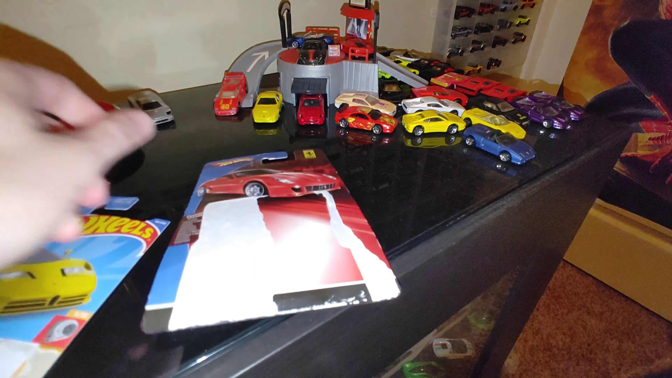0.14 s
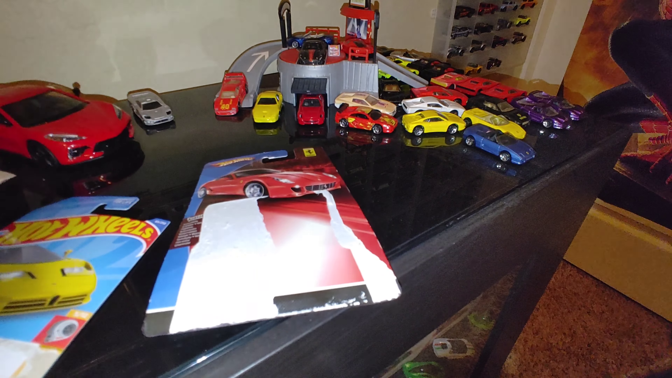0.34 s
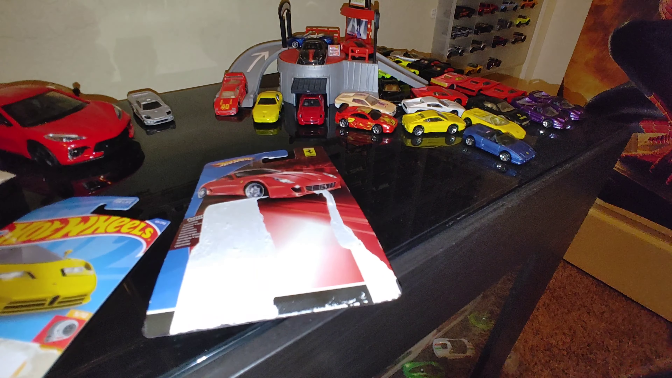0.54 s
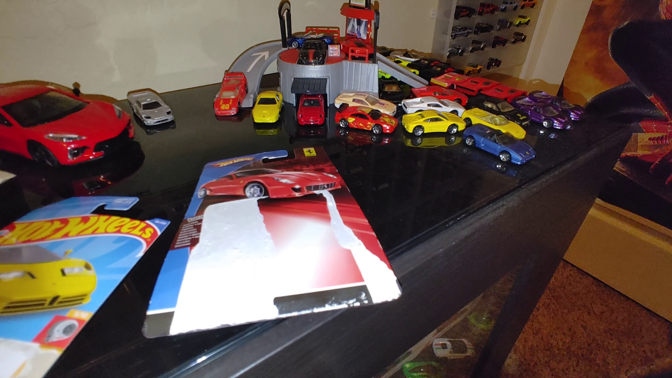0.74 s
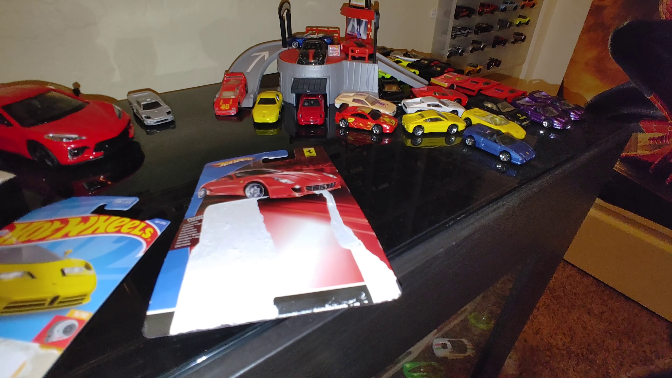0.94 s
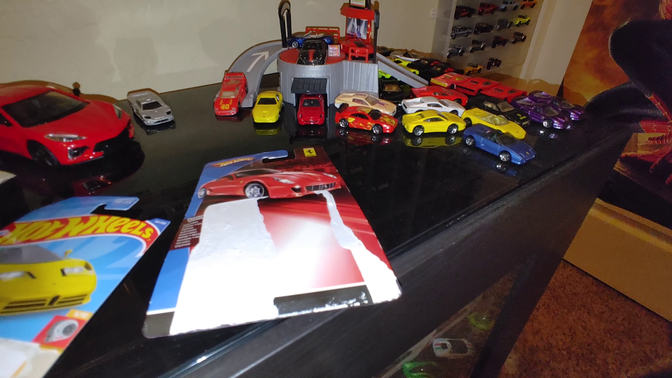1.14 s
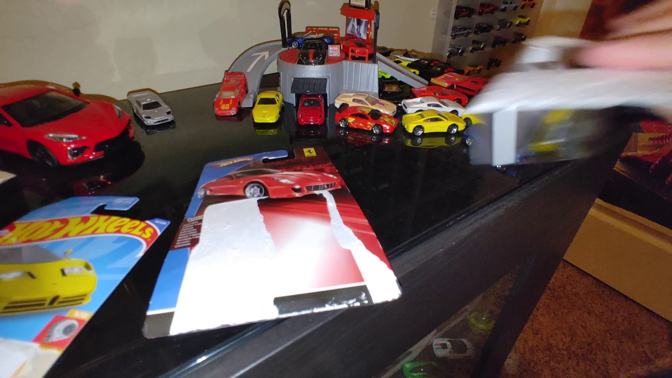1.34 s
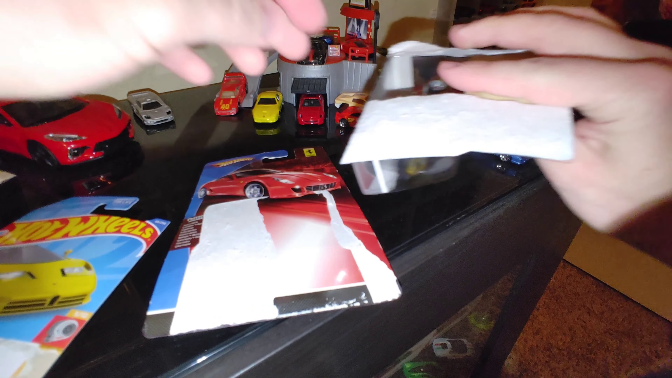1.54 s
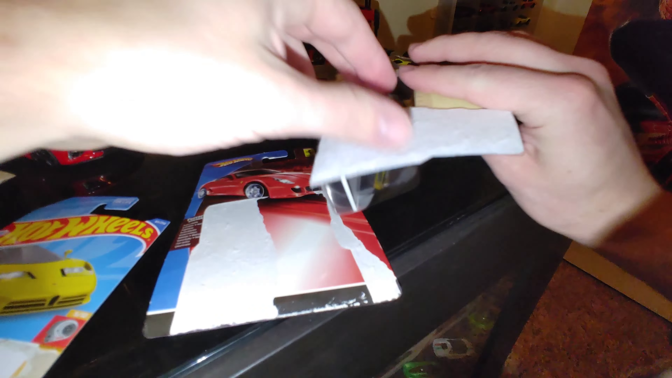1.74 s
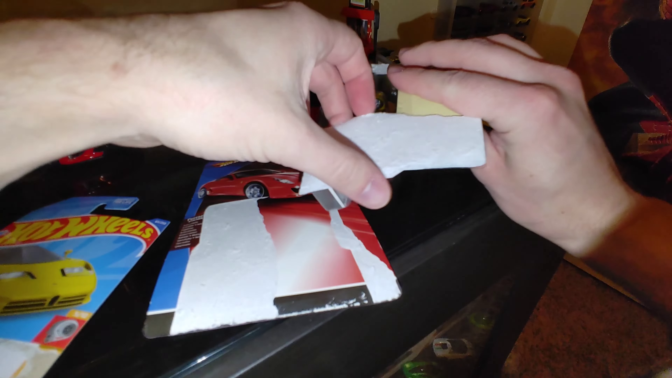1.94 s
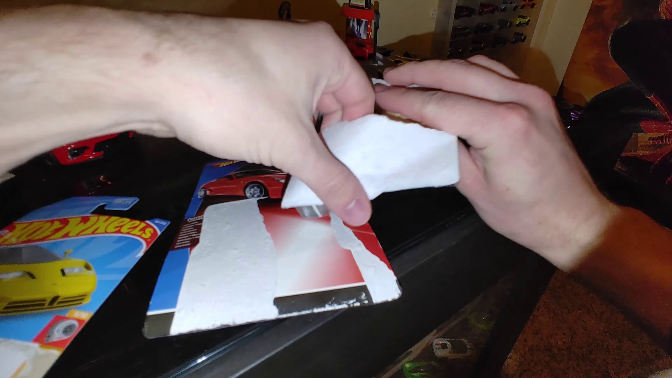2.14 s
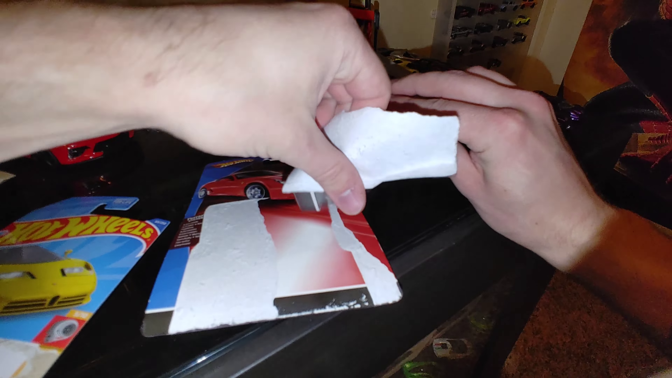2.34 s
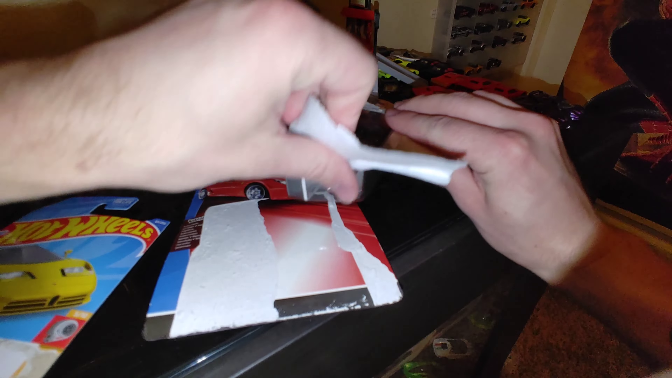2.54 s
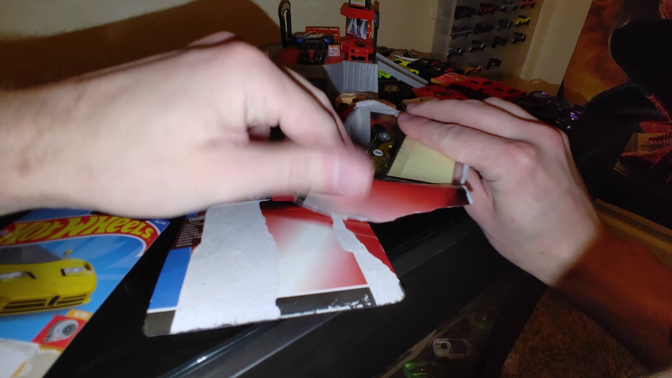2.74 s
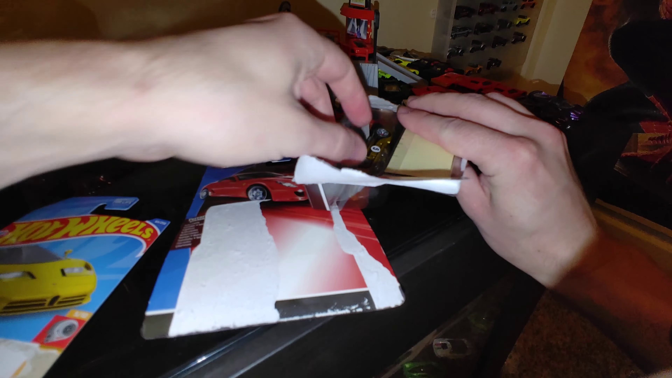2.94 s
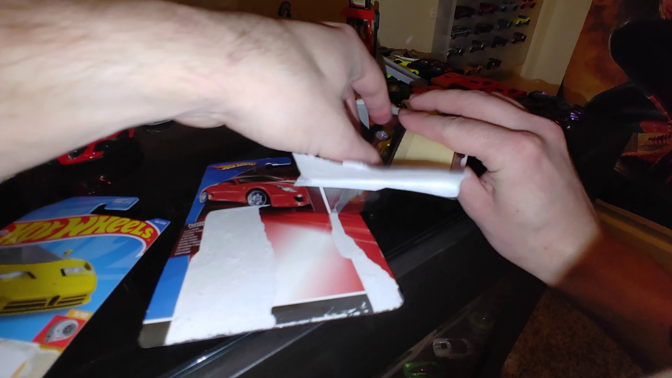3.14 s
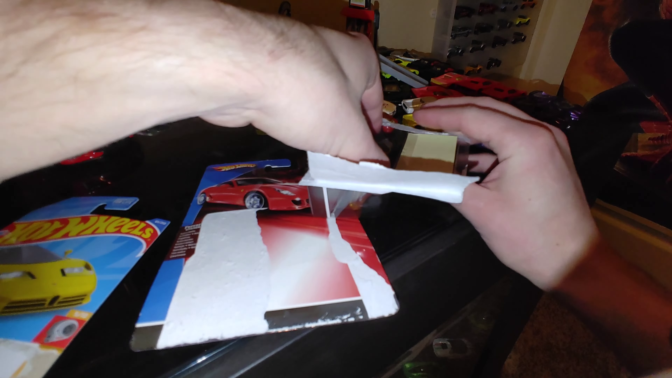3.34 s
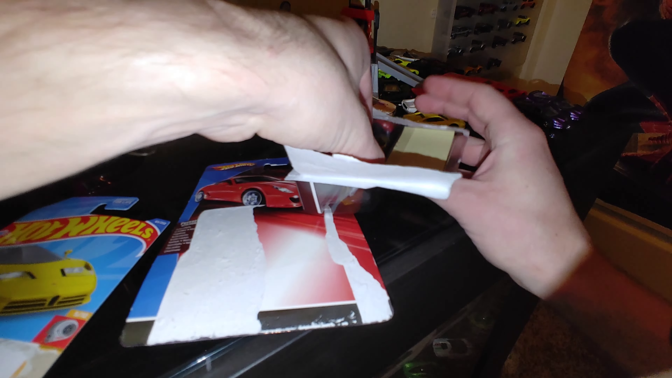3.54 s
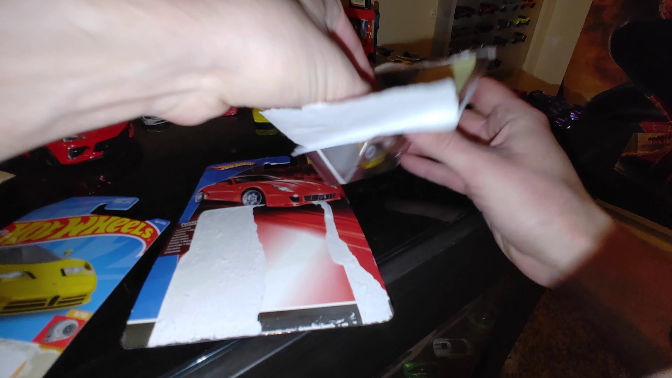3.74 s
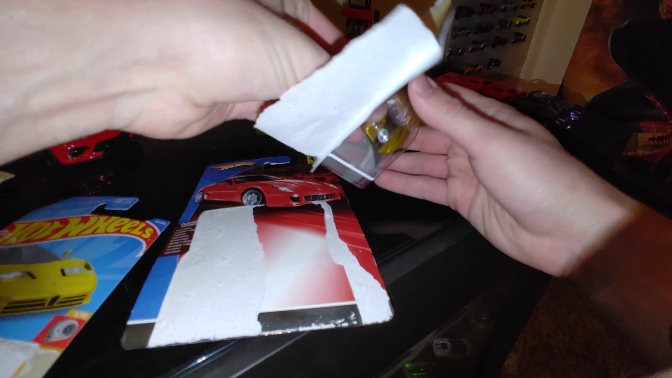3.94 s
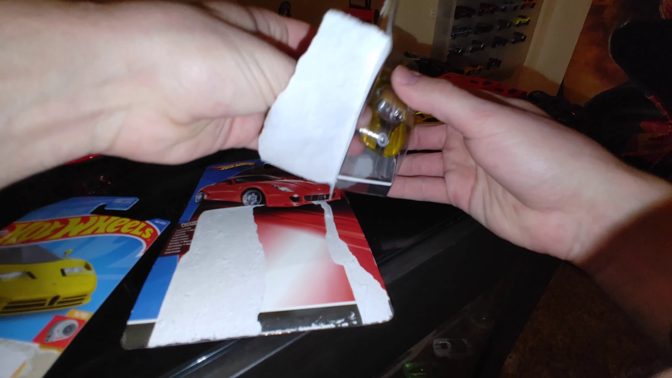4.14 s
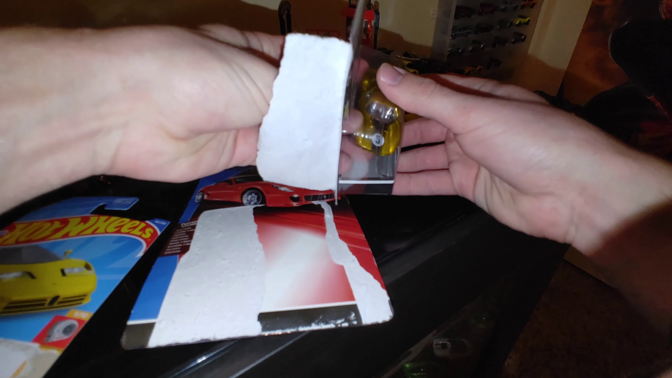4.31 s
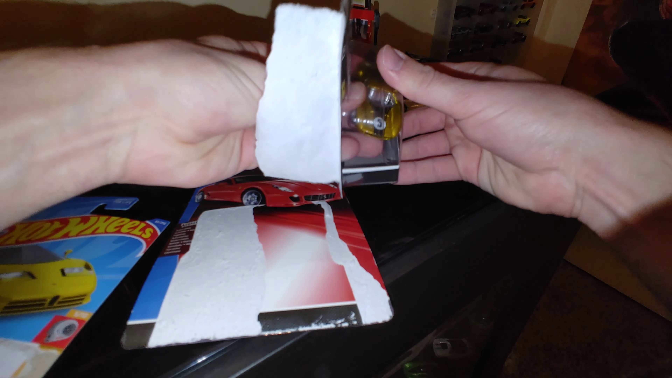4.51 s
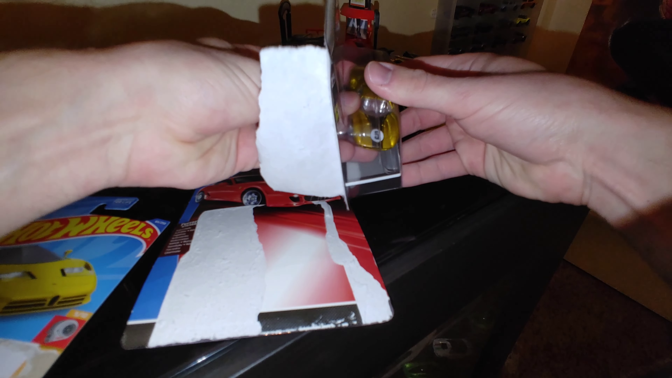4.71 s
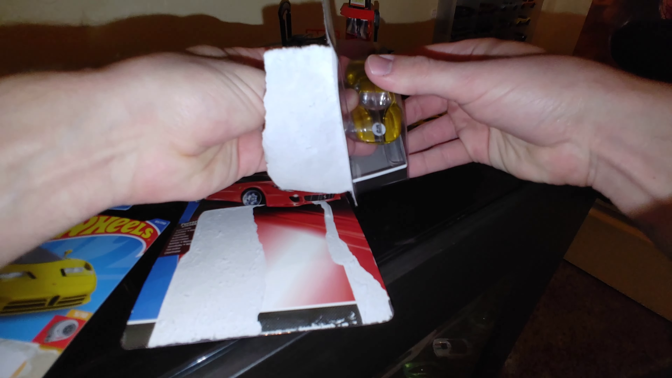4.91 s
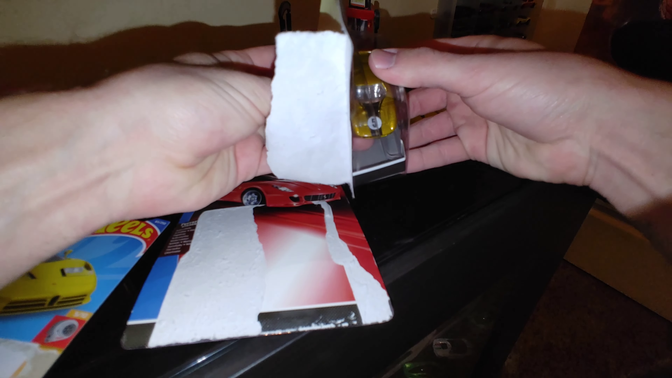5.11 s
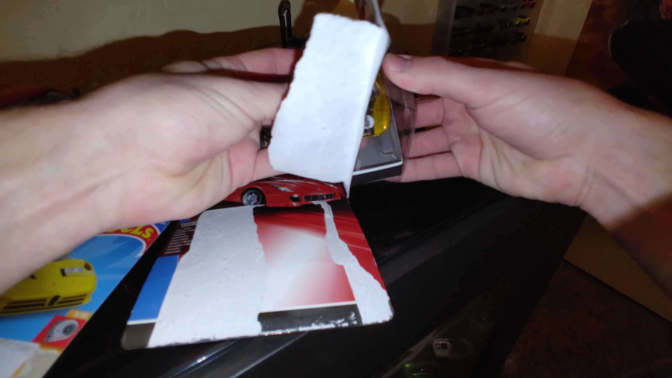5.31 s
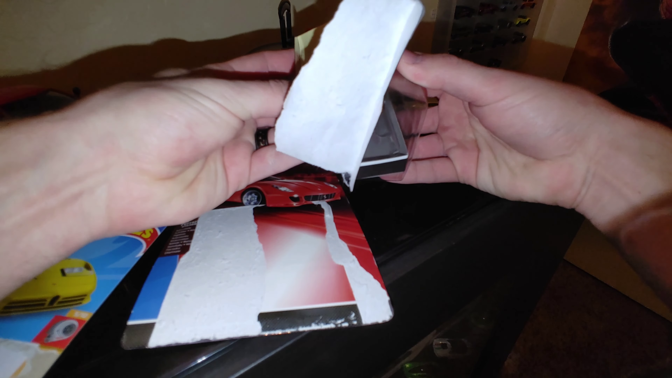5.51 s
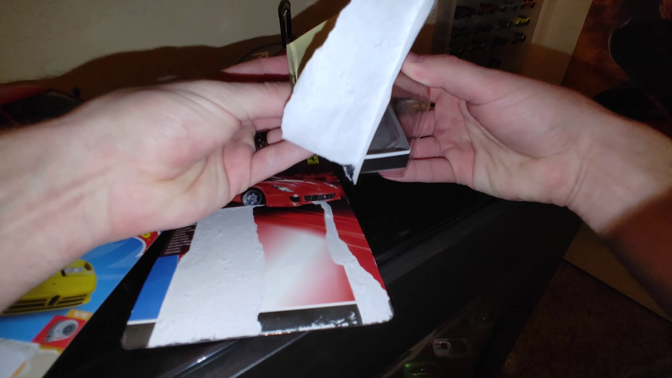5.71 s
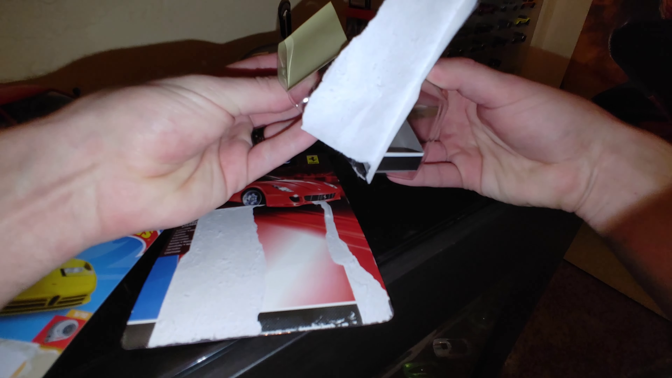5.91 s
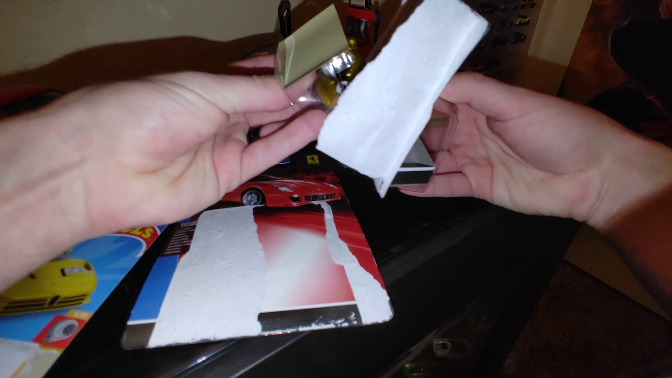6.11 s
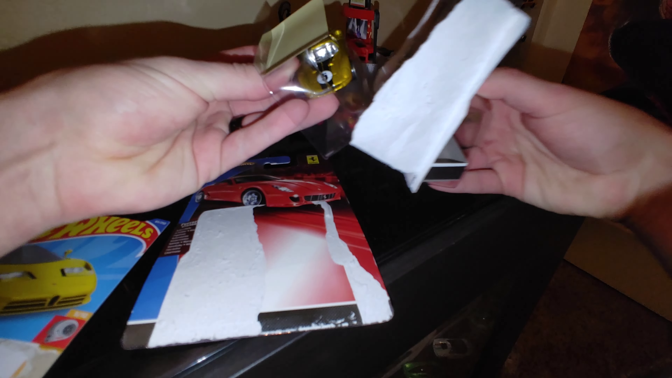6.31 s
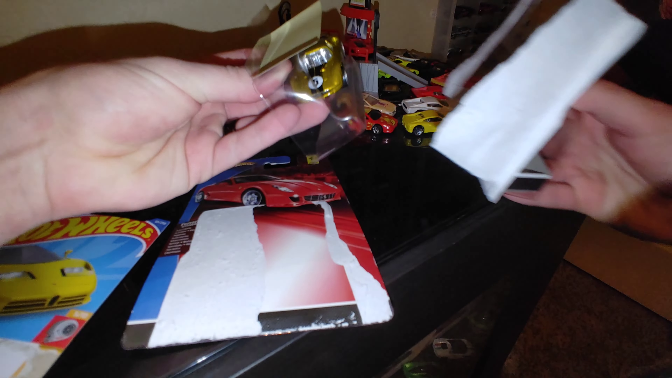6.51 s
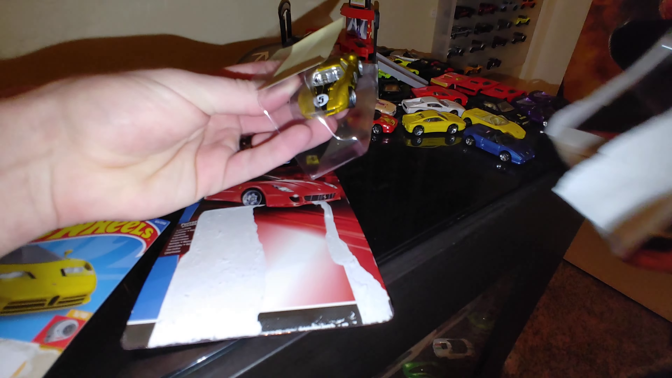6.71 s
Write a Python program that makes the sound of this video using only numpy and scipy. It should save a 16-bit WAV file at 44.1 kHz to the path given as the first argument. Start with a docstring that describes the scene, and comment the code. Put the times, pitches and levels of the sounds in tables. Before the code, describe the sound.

In a small furnished room with a faint hiss, a plastic blister pack is handled close up, ticking softly at first. After about two seconds the plastic buckles loudly and the glued cardboard crackles apart. Fingers rub and scuff the hollow shell between isolated sharp snaps. Around six seconds the card rips again in a crackling burst, then the handling dies down to a final click.

```python
"""A small blister pack of stiff plastic and torn card is pried apart by two hands, close to two microphones.
The shell buckles and releases its strain in sharp snaps; glue and paper fibres part in a dense crackle.
Fingers rub, scuff and knock the hollow shell; friction adds an airy rustle and the swish of card.
A small furnished room answers with a short reverberant tail over a faint hiss."""
import sys
import numpy as np
from scipy import signal
from scipy.io import wavfile

SR = 44100
rng = np.random.default_rng(int(sys.argv[2]) if len(sys.argv) > 2 else 0)


def bounce(signal):
    """Save signal as a 16-bit WAV file at the path given by the first command-line argument."""
    frames = np.transpose(np.atleast_2d(signal))
    limited = np.clip(frames, -1, 1)
    pcm = np.round(limited * 32767).astype(np.int16)
    wavfile.write(sys.argv[1], SR, pcm)


N = 298071

# Levels in the tables are relative; a pan is the left level minus the right.
# Buckling folds. Each row: start in seconds, level in dB, panel resonance in Hz, levels in dB of the
# thump and of the low, upper and treble bands, rise time in ms, decay time in ms, pan in dB.
SNAPS = [(0.047, -32.5, 1770, -25, -18.5, -18.5, -39.5, 0.77, 3.6, 12),
         (0.074, -25, 1570, -30, -21, -6.5, -19, 0.64, 2.2, 7),
         (0.084, -26.5, 1660, -55.0, -26.5, -14, -29, 1.28, 1.4, 4),
         (0.132, -31, 1760, -21, -14.5, -8.5, -20, 0.4, 3.6, 5),
         (0.243, -39.5, 1520.0, -55.0, -8, -14, -36.0, 0.56, 5.3, 5),
         (0.374, -47, 1430, -51, -4.5, -28, -47.5, 0.26, 2.3, 6),
         (0.45, -46, 770, -55.0, -12, -18, -30, 0.61, 3.5, 4),
         (0.608, -49, 1460.0, -55.0, -18, -13, -8, 1, 4.7, -8.0),
         (0.714, -53, 5900, -55.0, -16, -8, -18, 0.93, 1.9, -9),
         (0.819, -66, 807.0, -55.0, -2, -13.5, -22, 1.5, 2.2, -1),
         (1.049, -62, 1610, -18.5, -18.0, 0, 2, 0.96, 1.8, -8),
         (1.109, -44, 860, -55.0, -16, -22, -22.0, 1.28, 3.8, 0),
         (1.126, -45.5, 7160.0, -8, -25, -22, -17.0, 1.28, 2.6, -10),
         (1.284, -45.5, 6900, -55.0, -20, -34, -14, 2.6, 2.3, -15.5),
         (1.614, -59, 4100, -55.0, -18, 3, -2, 0.67, 2.6, -3.5),
         (1.712, -50.5, 724.0, -14, -4, -8, -12, 1.7, 2.6, 3),
         (1.827, -44, 690, -55.0, -18, -12, -13.5, 2.1, 7.8, -1),
         (1.864, -38, 1390, -15, -7, -6.5, -11, 2.1, 12, 2.5),
         (1.89, -26, 1420, -55.0, -25, -18, -23.5, 2.1, 7.7, 3),
         (1.922, -41.5, 1710, -55.0, -14.0, -5.5, -6, 1.9, 15, 4),
         (1.958, -30.5, 1500, -22, -19, -14, -16, 2, 9.6, 7.5),
         (1.974, -24.5, 1410, -16, -12, -10.5, -9, 0.98, 2.6, 5),
         (2.013, -53, 1960.0, -11, -25.5, -4, 5.5, 1.28, 4.2, 1),
         (2.06, -29, 1720, -27, -39.5, -16.5, -10, 1.28, 2.0, 8),
         (2.074, 0.5, 2860, -33, -23, -15.5, -19, 0.48, 1, 4),
         (2.103, -23, 1440, -48, -39.5, -12.5, -6.5, 3.8, 14, 3.5),
         (2.138, -22.5, 1610, -36, -8.5, -4.5, -12, 1.2, 1.9, 8.5),
         (2.165, -17.5, 4270, -10, -1.5, -7, 5.5, 1.28, 2.2, 0.5),
         (2.175, -21, 4100, -55.0, -1.5, 4.5, 3, 1.1, 0.68, 1),
         (2.202, -30.5, 1410.0, -55.0, -23, 2, 8, 1.28, 1.4, 4),
         (2.211, -21, 940.0, -42.5, -37.5, -17, -6.5, 1.28, 2.2, 5),
         (2.278, -15, 850, -55.0, -6, -7, -3, 1.2, 3.1, 7),
         (2.287, -5.5, 730, -28, -40, -11, -13.5, 2, 0.48, -1),
         (2.291, -16, 1030, -55.0, -11, -0.5, 2, 2, 6.3, 5),
         (2.311, -31.0, 2980.0, -22, -8, -22.0, -32.5, 1.28, 3.5, -6),
         (2.337, -14.5, 3720, -55.0, -20, -17, -1, 1.28, 0.84, -3),
         (2.346, -9, 3940, -19, -2.5, -7, -7, 0.34, 1.1, 8.5),
         (2.368, -5, 1532, -24, -9, -4.5, -5, 1.28, 0.79, -1.5),
         (2.378, -17, 1600.0, -55.0, -14.0, -23, -27.5, 1.28, 0.88, -4),
         (2.412, -19.5, 1750, -49, -37.5, -8, -6.5, 1.28, 2.8, 4),
         (2.449, -8.5, 7400, -21.5, -19, -7.5, -3.5, 2.15, 0.97, 0.5),
         (2.453, -15.5, 936, -55.0, -8, -10.5, -10.5, 1.2, 8.4, 7),
         (2.473, -19.5, 1890, -19, -14, -5.5, -2, 1.5, 11.6, -1),
         (2.508, -20.5, 2870, -30, -34.5, -4, -3.5, 1.2, 3.7, -1),
         (2.68, -30.5, 5400, -57, -14, -13, -16.5, 0.56, 11, 3.5),
         (2.698, -32.5, 3670, -33.5, -15, -8, -11, 0.72, 9.8, 4.5),
         (2.716, -35, 1670, -10, -11, -22, -25.0, 0.81, 2.5, 0),
         (2.789, -39, 8300, -55.0, -31, -5.0, 3.5, 1.28, 2.2, -1),
         (2.833, -27.5, 1640, -55.0, -36, -20, -43.0, 0.34, 3.5, 0.0),
         (2.909, -40.0, 980.0, -14, -15, -4, -7, 1.6, 8.5, 2),
         (2.925, -23.5, 1030, -24, -13, -4.5, -19, 1.5, 7.5, 4.5),
         (2.95, -34, 2170, -17, -29, -10, -8, 1.9, 8.7, 1),
         (2.996, -43, 5400, -30, -30.5, -0.5, 2, 1, 11.4, 2),
         (3.039, -22.5, 2500, -55, -15, -8.5, -22, 3.4, 2, 2.5),
         (3.191, -17, 4180, -23, -24, -21, -21, 2.1, 1.6, 1.5),
         (3.219, -24, 2190, -26, -23, -38, -41, 1.5, 2.7, 6.0),
         (3.342, -44.5, 1570, -58, -18, -13.5, -12, 1.4, 12.5, 0.0),
         (3.379, -46.5, 1010.0, -54, -14, -23.5, -23, 1.5, 3.0, 10),
         (3.443, -41, 1470, -29, -18, -15, -7, 1.9, 16, -1.0),
         (3.46, -30.5, 1200.0, -34, -31, -13, -3.5, 1.4, 1.7, 6),
         (3.661, -40.5, 1950.0, -51, -8.5, -19, -29, 0.51, 2.3, 6.0),
         (3.775, -38.0, 6500.0, -16.5, -12.5, -9, -9.5, 1.8, 2.6, 2.0),
         (3.791, -46, 1670.0, -16.5, -13.5, -6.5, -7.5, 1.4, 8.9, 1),
         (3.909, -50, 856.0, -10, -0.5, -5, -18, 1.28, 1.5, -0.5),
         (3.934, -53.5, 856, -50.5, -13, -7.5, 3.5, 1.28, 1.3, -7),
         (4.044, -56.5, 7400.0, 2.5, -17, -1.5, 14.5, 0.61, 1.5, -3),
         (4.1, -24.0, 3500, -39.5, -23, -5.5, -2.5, 1, 0.75, 5),
         (4.116, -14.5, 897, -46, -14.0, -7, -13.5, 1.2, 2.6, 3),
         (4.12, -21, 1600, -55.0, -10.5, -14, -18.5, 1.4, 3, -4),
         (4.244, -52.5, 3330.0, -58, -17, -2.5, 2, 1.2, 10, 7.5),
         (4.292, -55, 6070.0, -22.0, -15, -19, -12, 1.1, 1, 5),
         (4.316, -15.5, 3340, -31, -16.5, -10.5, -5.5, 0.91, 2.2, 4.5),
         (4.425, -45, 836, -7, -8.5, -5, 1, 1.3, 5.2, 1),
         (4.632, -28, 2334, -54, -18, -11, -13, 0.37, 2.3, 3),
         (4.758, -12, 2300, -35.5, -25.5, -13.5, -18, 0.95, 1.4, 2),
         (4.932, -39.5, 6100, -56.5, -12.5, -8.0, -9, 0.88, 1.8, 5),
         (4.978, -2, 2700, -53.5, -15, -17.5, -28, 0.25, 2.15, 3.5),
         (4.99, -16, 2030, -55.0, -24.5, -13, -24, 1.1, 1.5, 5),
         (5.028, -18.5, 7240.0, -41, -16, -7, -8, 1.4, 0.73, -1),
         (5.032, -28.5, 6670.0, -55.0, -3.5, 1.0, 6, 2.2, 2.2, 4),
         (5.043, -27, 5030, -55.0, -2.5, 0, -1, 1.6, 1.3, 6),
         (5.049, -17, 7000.0, -45.0, -27, -19.5, -35, 0.87, 0.73, -2),
         (5.35, -44, 6700, -56.5, -3, 1, 6.5, 1.65, 3.6, 2),
         (5.365, -43, 3710.0, -50, -11, -8, 0.5, 1.2, 4.2, 14),
         (5.378, -27, 663.0, -34, -10, -2, 9.5, 1.1, 1, 2.5),
         (5.385, -31, 990, -55.0, -18, -3.5, 2, 1, 5.6, 5.5),
         (5.422, -33, 2400, -55.0, -27, 0, -1, 2.4, 1.1, 5),
         (5.437, -15, 2176, -55.0, -21.5, -16.5, -9.5, 0.29, 2, 0),
         (5.531, -48.5, 1875, -18, -0.5, -6, 1.5, 1.9, 2.9, 2.5),
         (5.545, -44, 2180.0, -32.0, -10, -13, -9.5, 1.1, 3.8, -3.5),
         (5.648, -21.5, 3310, -25.5, -17.5, -43, -52, 0.43, 2.2, 4),
         (5.659, -29.5, 1710, -52.5, -44.5, -38.5, -49.5, 2.4, 3.8, 5),
         (5.719, -33, 2490, -20.5, -15, -19.5, -24, 2, 11, 6),
         (5.775, -41.5, 1350.0, -14, -9.5, -36, -47, 0.85, 3, 3.5),
         (5.866, -25, 2910, -41, -17, -18.5, -29, 1.8, 11, 5.5),
         (5.896, -25.5, 920.0, -47, -33, -29, -37.5, 1.4, 6.0, -4),
         (5.912, -28.5, 1540.0, -44, -26.5, -26, -33.0, 1.4, 4.6, 3),
         (5.926, -22.5, 1550, -39, -31, -13, -18, 1.4, 5.4, 6),
         (5.981, -23.5, 960, -55.0, -35.5, -17, -13, 0.78, 9.8, 3),
         (5.991, -17, 3400, -51, -38.5, -39, -10.5, 3.3, 8.1, 0.0),
         (6.011, -15.5, 2570.0, -47, -18.0, -18, -16, 1.2, 7.4, 9),
         (6.046, -14, 3140, -39.0, -42.5, -18, -12, 1.5, 3.1, 4.5),
         (6.053, -16.5, 820, -55.0, -42, -4, -34, 1, 7.2, 1.0),
         (6.071, -8.5, 2780, -47, -40, -9, -9.5, 1.2, 2.3, 4),
         (6.077, -5, 2300, -41.5, -19, -11.5, -15, 1.4, 5.2, 1),
         (6.094, -24, 1600, -30, -6.5, -1.5, -1, 1.28, 6.3, 0),
         (6.133, -12.0, 2630.0, -52, -27, -6, -14, 1.5, 7.8, 4),
         (6.144, -14, 7020, -30, -6, -2, -4.5, 1.8, 5.1, 0),
         (6.168, -32, 2056, -23, -9, -28.5, -35, 1.08, 6.6, 9),
         (6.668, -57.5, 4910, -54, -7.5, -9.0, -12, 1.6, 1.5, -2),
         (6.687, -24, 7700, -29, -16, -2, 1.5, 0.32, 1.8, 0.5)]
# Broad resonances of card and shell. Each row: frequency in Hz, bandwidth in Hz, gain in dB.
SHELL_MODES = [(1040, 170, -3.5), (1580, 400, -14), (1770, 150, 8), (2800, 200, -22), (4200, 1500, 1.5)]
# Resonances of air and card under the fingers. Each row: frequency in Hz, bandwidth in Hz, gain in dB.
HOLLOW_MODES = [(274, 150, 4), (298, 16, 4), (400, 14, -3.5), (696, 97, -3.5)]
# Strain on the pack and finger pressure. Each row: time in seconds, crackle level in dB, rub level in dB.
STRAIN = [(0.0, -80, -58.5), (0.04, -63, -60.5), (0.3, -75.5, -76), (0.9, -79, -82.5), (1.32, -71.5, -69.5),
          (1.56, -73.5, -67.5), (1.88, -74.5, -76.5), (2.03, -44.5, -61.5), (2.26, -40, -55.5),
          (2.35, -47, -68), (2.5, -64, -81), (2.77, -58.5, -69.5), (2.88, -66, -66), (3.12, -58, -67),
          (3.24, -72.5, -79), (3.44, -70, -71), (3.99, -70, -67), (4.46, -64.5, -68), (4.59, -63.5, -69),
          (4.76, -91, -80), (5.01, -66.5, -73.5), (5.18, -71.5, -66), (5.7, -79.5, -70), (5.91, -58, -61),
          (6.04, -39.5, -61.5), (6.1, -32, -54), (6.25, -87, -69.5), (6.76, -82.5, -88.5)]
# Skin brushing card. Each row: time in seconds, level in dB.
RUSTLE_LEVELS = [(0.0, -74), (0.09, -76), (0.22, -97), (0.88, -84), (1.41, -59), (1.81, -73), (1.9, -67.5),
                 (2.13, -48.5), (2.28, -48), (2.33, -38.5), (2.37, -48), (2.47, -55), (2.75, -67.5),
                 (3.16, -72.5), (3.56, -76), (3.71, -79.5), (4.46, -60), (4.61, -74.5), (5.38, -74.5),
                 (5.53, -73), (5.74, -76), (6.04, -56.5), (6.08, -57.5), (6.19, -76), (6.42, -83.5),
                 (6.76, -84)]
# Where the hands work. Each row: time in seconds, pan in dB before it is narrowed for wide sounds.
HAND_PAN = [(0, -1), (.5, -19), (.6, -29), (1.3, -24), (1.75, 4.5), (4.0, 3.5), (6.76, 6.5)]
# Spectrum of the background noise. Each row: frequency in Hz, spectral density in dB.
HISS_SPECTRUM = [(15, -56), (25, -22.5), (64, -13), (335, -7), (427, -0.5), (1260, -38.5), (1610, -18.5),
                 (1740, -5), (1890, -16.5), (3720, -23), (7510, -59), (12900, -19), (14500, -14),
                 (17000, -6)]
# Likeness of that noise at the two microphones. Each row: frequency in Hz, correlation coefficient.
HISS_CORRELATION = [(60, 0.66), (240, 0.94), (950, 0.11), (3770, 0.08), (15000, 0.12)]
# Short scuffs, hollow knocks and a faint ring after the last tear. Each row: start in seconds,
# level in dB, resonance in Hz, level of the broadband part in dB, pan in dB, length in ms.
SCUFFS_AND_KNOCKS = [(0.001, -46, 1520, -42, 9, 75), (4.46, -46.5, 240, -29.5, -0.5, 160),
                     (0.098, -41, 2680, -39, 12, 12), (0.612, -53, 960, 3, -10, 25),
                     (1.129, -58.5, 1010, 6, -15.5, 36), (2.702, -38.5, 1820, -25, -1, 51),
                     (3.041, -38, 2660, -7, -3, 29), (3.193, -35, 940, 0.5, 1.5, 15.7),
                     (3.454, -38, 1390, -7.5, -2, 51), (3.909, -44, 855, -24, 3.5, 27),
                     (5.141, -48, 1010, -39.5, 1.5, 34), (5.379, -31.5, 784, -0.5, 1, 12.6),
                     (5.898, -38.5, 950, -6, 3.5, 62), (1.26, -62, 790, -3, -2, 150),
                     (1.56, -65, 600, -8, 0, 140), (4.1, -42, 382, -29, 2, 55),
                     (6.219, -65, 1780, -40, 1, 365), (2.288, -26.5, 415, -30, 3, 37),
                     (3.036, -47, 280, -22.5, 1, 62), (5.375, -36.5, 322, -26.5, -5, 30),
                     (5.02, -46.5, 288, -27.5, 0, 55), (6.14, -25, 283, -29.5, -6, 27),
                     (6.143, -27.5, 880, -27, 4, 20.4)]
# Card sliding over skin or table. Each row: start in seconds, length in seconds, level in dB,
# level of the top band in dB.
SLIDES = [(0.186, 0.099, -67.5, -13), (0.609, 0.034, -64.5, -14), (1.109, 0.054, -66, -12),
          (1.246, 0.27, -67.5, -24), (2.6, 0.1, -77, 11.5), (3.426, 0.12, -67, -3.5),
          (4.048, 0.05, -61.5, -2), (4.248, 0.019, -75, -5), (4.462, 0.16, -62.5, -5),
          (5.891, 0.067, -46, -10.5), (5.016, 0.054, -41.5, -10)]
# Resonances of the card's edges. Each row: frequency in Hz, bandwidth in Hz, gain in dB.
CARD_EDGE_MODES = [(3980, 370, -6.5), (6500, 1400, 0)]
# Microphone openings. Each row: frequency in Hz, bandwidth in Hz, left gain in dB, right gain in dB.
PORT_RESONANCES = [(730, 3980, 6, 8), (6560, 1100, -9, 5), (6790, 380, 8, 3.5), (7690, 1300, -4, -6),
                   (11100, 6300, 7.5, 3)]


def from_db(db):
    return 10 ** (np.asarray(db) / 20)


def unit_rms(x):
    return x / np.sqrt(np.mean(x ** 2) + 1e-20)


def at_hz(points, hz):
    frequencies, values = np.transpose(points)
    return np.interp(np.log(hz), np.log(frequencies), values)


def at_times(rows, t):
    times, *columns = np.transpose(rows)
    return [np.interp(t, times, column) for column in columns]


def panned(x, pan_db):
    return np.array([x * from_db(pan_db / 2), x * from_db(-pan_db / 2)])


def band(x, low_hz, high_hz, order=2):
    sos = signal.butter(order, [low_hz, min(high_hz, .45 * SR)], "band", fs=SR, output="sos")
    return signal.sosfilt(sos, x)


def resonate(x, hz, width_hz):
    """A damped oscillator: two poles, unit gain at resonance."""
    r = np.exp(-np.pi * width_hz / SR)
    feedback = [1, -2 * r * np.cos(2 * np.pi * hz / SR), r * r]
    return signal.lfilter(np.array([1, 0, -1]) * (1 - r * r) / 2, feedback, x)


def drift(rate_hz):
    """Low-passed noise gives a slow random fluctuation of unit RMS."""
    r = np.exp(-2 * np.pi * rate_hz / SR)
    return unit_rms(signal.lfilter([1], [1, -2 * r, r * r], rng.standard_normal(N + SR))[SR:])


def grains(per_s, spread_db, clump_db):
    """Shot noise: tiny breaks or slips come at random, in clumps as their rate fluctuates."""
    sizes = from_db(spread_db * np.minimum(rng.exponential(1, N), 5)) * rng.choice([-1, 1], N)
    occurs = rng.random(N) < per_s * from_db(clump_db * drift(60)) / SR
    return sizes * occurs + 1e-18


def crackle(level_db, body_db=-5.5, bright_db=-7.5):
    """Fracture: parting fibres and glue emit broadband clicks and excite the modes of card and shell."""
    breaks = grains(per_s=4100, spread_db=0, clump_db=7.5)
    body = sum(from_db(db) * resonate(breaks, hz, width_hz) * (-1) ** k
               for k, (hz, width_hz, db) in enumerate(SHELL_MODES))
    broad = unit_rms(band(breaks, 710, 8400))
    bright = unit_rms(band(breaks, 4800, 16000, order=3))
    return from_db(level_db - 8.5) * (from_db(body_db) * unit_rms(body) + broad + from_db(bright_db) * bright)


def rub(level_db):
    """Cavity resonance: skin slipping on the shell sets its hollow humming."""
    slips = grains(per_s=400, spread_db=3.5, clump_db=5.5)
    hum = sum(from_db(db) * resonate(slips, hz, width_hz) for hz, width_hz, db in HOLLOW_MODES)
    return from_db(level_db - 4) * unit_rms(hum)


def rustle(t, trim_db=-14.5):
    """Friction of skin on card: many fine slips merge into a smooth noise high in the treble."""
    level_db, = at_times(RUSTLE_LEVELS, t)
    friction = grains(per_s=11000, spread_db=3.5, clump_db=3)
    return from_db(level_db + trim_db) * unit_rms(band(friction, 11000, 21000))


def hiss(level_db=-76.5, flicker_db=1.5):
    """Partly correlated noise of room and microphones, in half-octave bands that each flicker a little."""
    out, edges_hz = 0, 20 * 2 ** np.arange(0, 10, .5)
    white = rng.standard_normal((2, 2, N))
    for k, (low, high) in enumerate(zip(edges_hz, edges_hz[1:])):
        mid, side = band(white[k % 2], low, high)
        hz = np.sqrt(low * high)
        correlation = at_hz(HISS_CORRELATION, hz)
        gain = from_db(at_hz(HISS_SPECTRUM, hz) + flicker_db * drift(7.4))
        out += gain * (np.sqrt(1 + correlation) * mid + np.sqrt(1 - correlation) * side * [[1], [-1]])
    return from_db(level_db) * unit_rms(out)


def scuffs_and_knocks(hollow_q=7.7, trim_db=-16.5):
    """Forced resonance: grainy noise rises fast and fades, driving one mode to a scuff, knock or ring."""
    out = np.zeros((2, N))
    noise = grains(per_s=10000, spread_db=5.5, clump_db=2)
    for start, db, hz, broad_db, pan_db, length_ms in SCUFFS_AND_KNOCKS:
        at, size = round(start * SR), round(length_ms * SR / 1000)
        drive = noise[at:at + size] * np.sin(np.pi * np.linspace(0, 1, size) ** .5)
        hollow = unit_rms(resonate(drive, hz, hz / hollow_q))
        broad = from_db(broad_db) * unit_rms(band(drive, 1400, 6200))
        out[:, at:at + size] += panned(from_db(db + trim_db) * (hollow + broad), pan_db)
    return out


def snaps(panel_q=2.7, ring_db=-10, middle_db=-14, trim_db=-10.5):
    """Buckling: a fold gives way in uneven slips that ring one panel, then settles softly."""
    lead_in_db, lead_in_ms = -18.5, 6   # a faint swell of noise leads into each snap
    settle_db, settle_ms = -25, 14
    push_ms, thump_scatter_db = 0.5, 7
    size, lead = SR // 12, SR // 40
    out = np.zeros((2, N + SR))
    ms = (np.arange(size) - lead) / SR * 1000 - 1.2   # zero at the peak, just after the start
    air_push = unit_rms(band(np.exp(-(2 * ms / push_ms) ** 2), 125, 480))
    slips, jolts = rng.standard_normal((2, len(SNAPS), size))
    paths = sound_paths(len(SNAPS))   # the hands have moved before each snap
    for row, slip, jolt, path in zip(SNAPS, slips, jolts, paths):
        start, db, hz, thump_db, low_db, upper_db, treble_db, rise_ms, decay_ms, pan_db = row
        release = np.exp(np.where(ms < 0, ms / rise_ms, -ms / decay_ms))
        lead_in = from_db(lead_in_db) * rise_ms * np.exp(ms / lead_in_ms) * (ms < 0)
        settling = from_db(settle_db) * np.exp(-ms / settle_ms) * (ms > 0)
        envelope = release + lead_in + settling
        burst = slip * from_db(6 * jolt) * envelope
        lingering = slip * envelope ** .89   # the treble is spread a little wider in time
        parts = [(low_db, band(burst, 680, 1850, order=3)),
                 (middle_db, band(burst, 1353, 2200)),
                 (upper_db, band(burst, 2800, 6000, order=3)),
                 (treble_db, band(lingering, 6000, 21000, order=3)),
                 (ring_db, resonate(resonate(burst, hz, hz / panel_q), hz, hz / panel_q))]
        snap = panned(sum(from_db(part_db) * unit_rms(part) for part_db, part in parts), pan_db)
        # The push of air reaches the two microphones unevenly.
        thump = panned(from_db(thump_db) * air_push, pan_db + thump_scatter_db * jolt[0])
        gain = from_db(db + trim_db) * np.sqrt(np.mean(envelope ** 2))
        heard = signal.fftconvolve(gain * (snap + thump), path, axes=1)
        at = round(start * SR)
        out[:, at:at + heard.shape[1]] += heard
    return out[:, lead:lead + N]


def slides(t, ramp_s=0.026):
    """Sliding friction: card makes a short, grainy swish, coloured by the resonances of its edges."""
    friction = grains(per_s=14000, spread_db=3, clump_db=5.5)
    edges = sum(from_db(db) * unit_rms(resonate(friction, hz, width_hz))
                for hz, width_hz, db in CARD_EDGE_MODES)
    swish = unit_rms(unit_rms(band(friction, 2380, 7640)) + edges)
    top = unit_rms(band(friction, 7640, 14000))
    out = np.zeros(N)
    for start, length, db, top_db in SLIDES:
        envelope = np.clip(np.minimum(t - start, start + length - t) / ramp_s, 0, 1)
        out += from_db(db) * (swish + from_db(top_db) * top) * envelope
    return out


def sound_paths(count, scatter_t60_s=0.0071, room_t60_s=0.17, max_right_lag_s=0.00031):
    """Stereo impulse responses: direct sound, scattering off hands and table, and reverberation."""
    t = np.arange(SR // 5) / SR
    scatter, shared, late = rng.standard_normal((3, count, 2, len(t)))
    scatter += band(shared[:, :1] - scatter, 120, 310, order=1)   # long waves reach both sides alike
    dull = signal.lfilter(*signal.butter(2, 2930, fs=SR), late)   # returned by the walls
    treble = signal.lfilter(*signal.butter(1, 7900, fs=SR), late) - dull   # furnishings absorb the top
    tail = (from_db(-30.5) * dull + from_db(-33.5) * treble) * from_db(-60 * t / room_t60_s)
    build_up = 1 - np.exp(-t / 0.0034)
    out = scatter * from_db(-20 - 60 * t / scatter_t60_s) + tail * build_up
    right_lag = (rng.random(count) * max_right_lag_s * SR).astype(int)
    out[:, 0, 0] += 1   # direct sound
    out[np.arange(count), 1, right_lag] += 1
    return out


def room(x, hop=2048):
    """Time-varying propagation: the pack moves, so each overlapping stretch takes a random path."""
    out, paths = np.zeros((2, N + SR)), sound_paths(16)
    window = np.hanning(2 * hop + 1)[:-1]
    x = np.pad(x, [(0, 0), (hop, 0)])
    for at in range(0, N + hop, hop):
        piece = x[:, at:at + 2 * hop]
        path = paths[rng.integers(len(paths))]
        heard = signal.fftconvolve(piece * window[:piece.shape[1]], path, axes=1)
        out[:, at:at + heard.shape[1]] += heard
    return out[:, hop:hop + N]


def microphone_ports(x):
    """Resonance in each microphone opening puts peaks and dips in the spectrum."""
    for hz, width_hz, left_db, right_db in PORT_RESONANCES:
        x = x + (from_db([[left_db], [right_db]]) - 1) * resonate(x, hz, width_hz)
    return x


def scene():
    """Superposition: handling noise and snaps reach the microphones through the room, over the hiss."""
    t = np.arange(N) / SR
    crackle_db, rub_db = at_times(STRAIN, t)
    pan_db, = at_times(HAND_PAN, t)
    wide_sounds = crackle(crackle_db) + rub(rub_db) + slides(t) + rustle(t)
    handling = panned(wide_sounds, 0.16 * pan_db) + scuffs_and_knocks()
    return microphone_ports(snaps() + room(handling)) + hiss()


def record(dry, cutoff_hz=15950):
    """Soft saturation amplifies the sound and rounds its peaks; a steep low-pass limits the bandwidth."""
    rounded = 1.837 * np.tanh(dry / 1.148)
    return signal.sosfilt(signal.ellip(12, .5, 90, cutoff_hz, fs=SR, output="sos"), rounded)


dry = scene()
out = record(dry)
bounce(out)
```